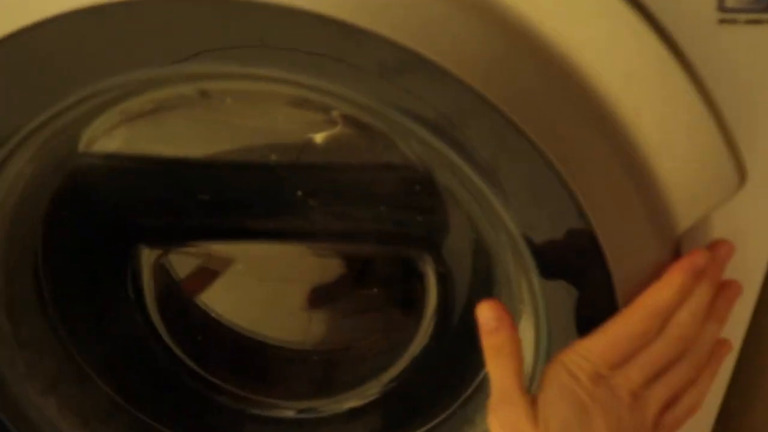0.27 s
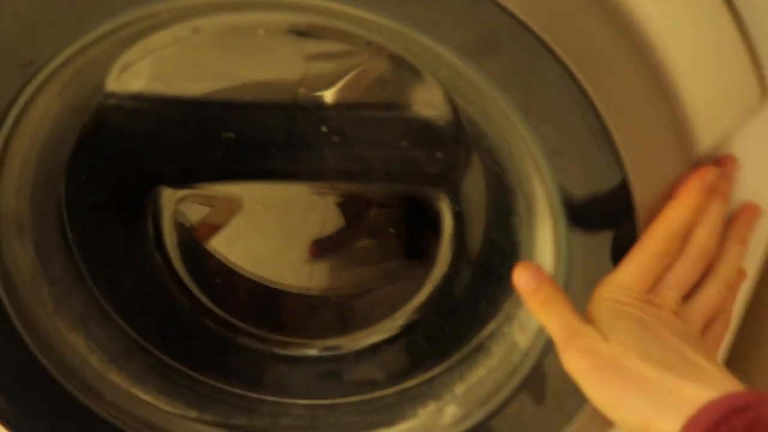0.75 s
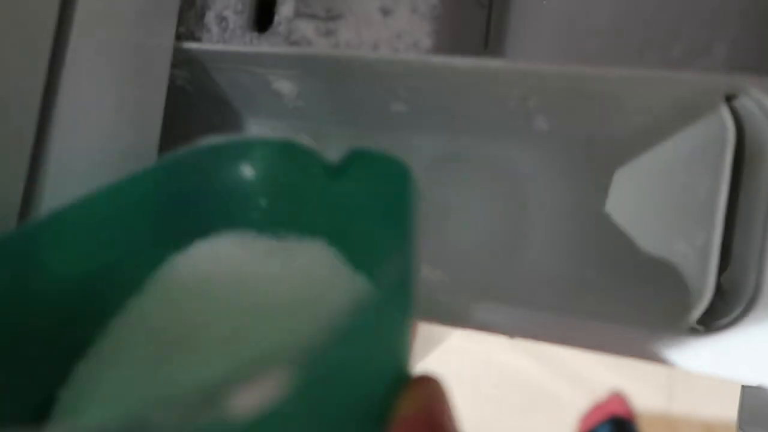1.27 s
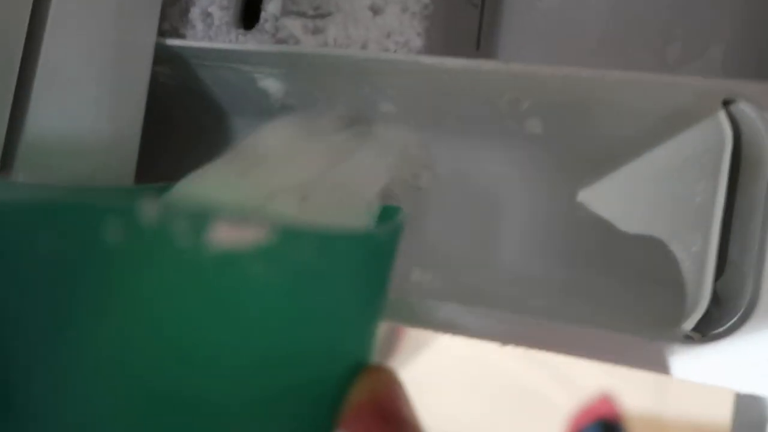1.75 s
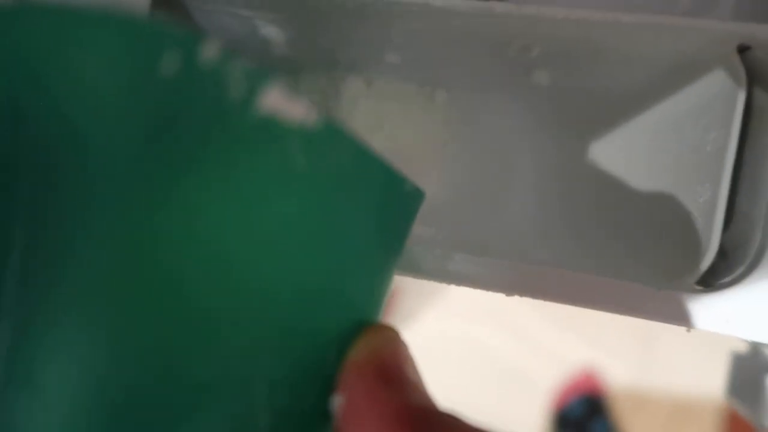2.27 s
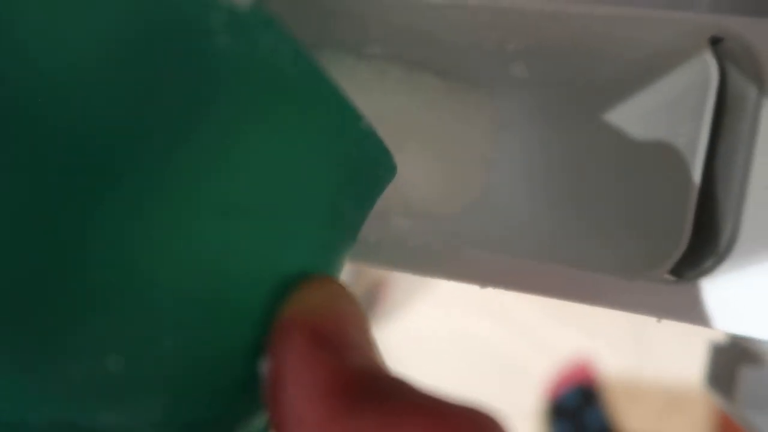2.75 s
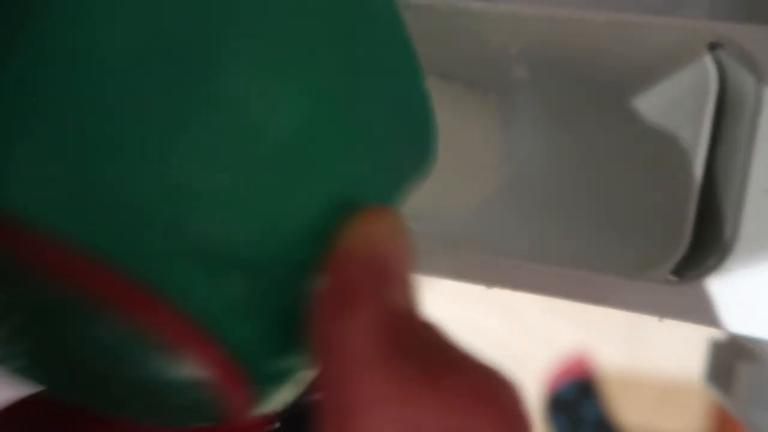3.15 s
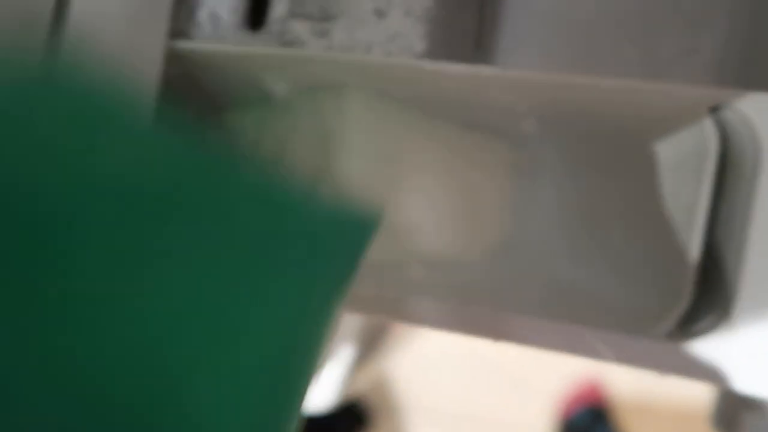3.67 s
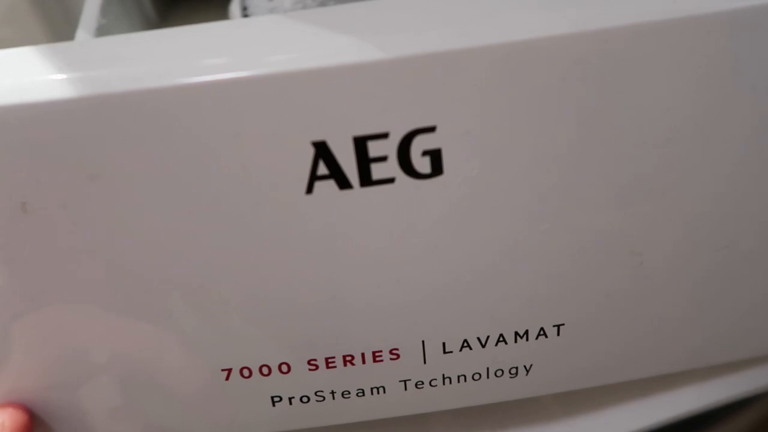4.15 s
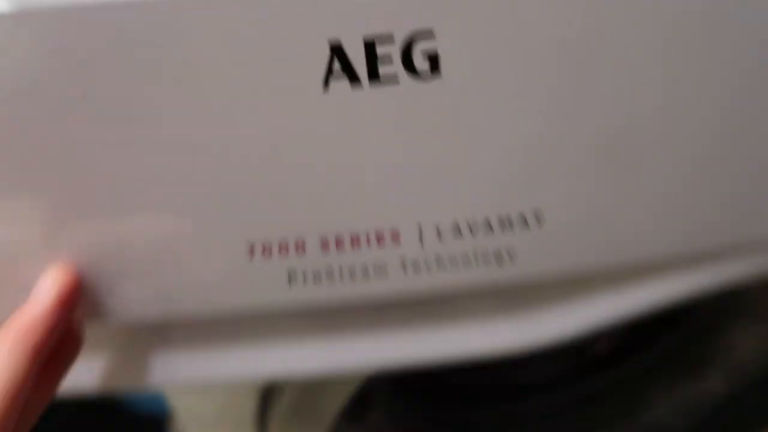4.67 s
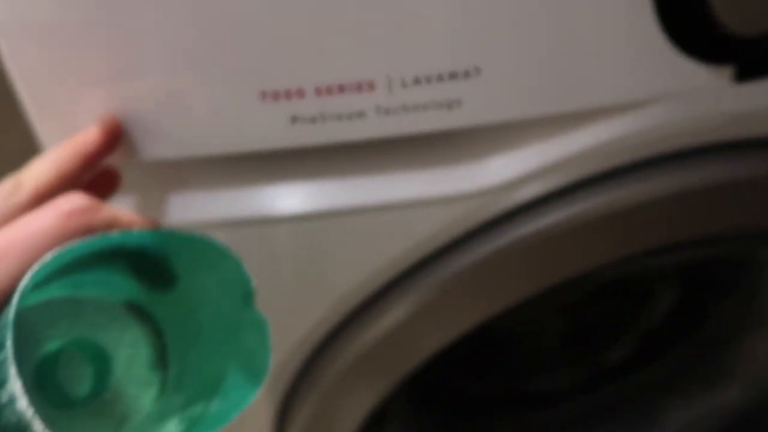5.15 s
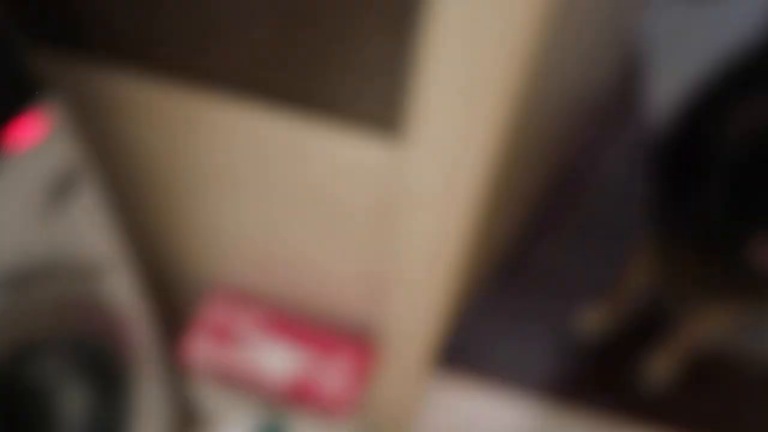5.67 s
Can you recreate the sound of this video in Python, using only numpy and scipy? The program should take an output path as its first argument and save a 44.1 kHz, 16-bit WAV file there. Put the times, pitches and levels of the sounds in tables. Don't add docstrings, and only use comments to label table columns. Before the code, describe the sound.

Close stereo in a small hard room: a palm brushes a washing machine door, which shuts with a booming double thunk and metallic ring. Powder hisses softly from a plastic scoop, which is then knocked hard three or four times. The drawer slides over grit and slams; after a brief silence a low pump hum surges in with watery churning.

```python
import sys
import numpy as np
from scipy import signal
from scipy.fft import rfft, irfft
from scipy.io import wavfile
from scipy.ndimage import uniform_filter1d, minimum_filter1d

SR = 44100
rng = np.random.default_rng(int(sys.argv[2]) if len(sys.argv) > 2 else 0)


def makeup_ratio(level_db):
    decades = np.asarray(level_db, float) / 20
    return 10 ** decades


def to_wav(sig):
    pcm = np.clip(np.atleast_2d(sig), -1, 1) * 32767
    pcm = np.round(pcm).astype(np.int16)
    wavfile.write(sys.argv[1], SR, pcm.T)


N = 260190

# t/s, peak/dB, bass re peak/dB, treble re peak/dB, favoured f/Hz
DOOR_BLOWS = [(0.114, -39.5, 6.5, -17, 1610), (0.141, -41.5, 6.5, -15, 215.5), (0.172, -44, -10, -26, 850),
              (0.293, -7, 9.5, -31, 452), (0.31, -7, 6.5, -27, 860), (0.404, -18, -2, -13, 439),
              (0.4207, -6.5, -4.5, 0, 450), (0.479, -27, 17, -9, 302), (0.619, -37.5, -8, 2.5, 300),
              (0.638, -43, -8, 3, 300), (0.754, -39.5, 18, -24.5, 342), (0.81, -26, -2.5, -25.5, 1700),
              (0.949, -40, -16, -49.5, 1140)]
SCOOP_BLOWS = [(1.447, -28, 1, -73, 470), (1.483, -42.5, 15, -11, 221), (1.446, -45.5, -20, -3, 4500),
               (1.557, -34, -15, -30, 450), (1.571, -39, -22, -16, 453), (1.873, -23.5, -9, -16, 910),
               (2.098, -39, -17, -35, 511), (2.269, -36, -21, -24, 482), (2.376, -13, -10, -106, 246),
               (2.399, -35, 3, -22, 240), (2.501, -39, -17, -35, 227), (3.039, -1, -11, -24.5, 520),
               (3.0745, -22, -15, -40, 487), (3.123, -21.5, -35, -42, 834), (3.2065, -3.5, -15, -27.5, 500),
               (3.268, -25.5, -12, -40, 760), (3.351, -3.5, -17, -28, 900), (3.514, -3, -31, -29, 430),
               (3.525, -14, -36, -26, 461)]
SCOOP_TICKS = [
    (1.724, -44, -20, -4, 2170),
    (3.1125, -18, -32, -16, 1800),
    (3.2585, -23, -18, -13.5, 2200),
    (3.379, -24, 1, -13.5, 1400),
    (3.627, -27.5, -7, -17.5, 2030),
    (3.725, -21, -18, -15, 1268),
]
DRAWER_BLOWS = [(4.515, -31.5, -14.5, -39, 277), (4.763, -27.5, -18, -27.5, 867),
                (4.821, -18, -9, -32, 622), (4.829, -20, -12, -40, 228), (4.835, -22, -25, -25, 1000),
                (4.903, -24.5, -25, -13, 1580), (4.93, -26, -23.5, -26, 727), (4.937, -6.5, -7, -18.5, 450),
                (4.944, -8, -28, -23, 740), (4.95, -4, -21, -10.5, 633), (4.952, 1, -10, -27, 705),
                (4.967, 2.5, -23.5, -13.5, 1350), (4.971, 6, -21.5, -12, 729), (4.975, -3.5, -12, -19, 861),
                (4.989, -9.5, -11, -17.5, 275), (5.477, -22.5, -15, -39, 161)]

# f/Hz, level/dB, T60/s
DOOR_MODES = [(56.2, -17, 0.48), (77, -15, 0.15), (139, -18.5, 0.12), (161, -7.5, 0.22), (222.7, -16, 0.49),
              (297.7, -19, 0.12), (450.6, -12.5, 0.046), (860, -13.5, 0.048), (1410, -13.5, 0.035),
              (2180, -21.5, 0.032), (2910, -10.5, 0.079), (3540, -2.5, 0.036), (4430, -17.5, .03),
              (8370, -16, .02), (12500, -22, .012)]
SCOOP_MODES = [(215, -16, 0.11), (258, -24.5, 0.27), (333, -17.5, 0.038), (472, -3, 0.024), (500, -28, 0.3),
               (672, 0.5, 0.023), (856, -1.5, 0.016), (1024, -7.5, 0.022), (836, -26, 0.15),
               (1246, -18, 0.041), (1390, -11, 0.04), (2193, -15.5, 0.027), (5260, -23.5, 0.026),
               (2970, -14, 0.026), (6520, -22, 0.018)]
DRAWER_MODES = [(91.5, -24, 0.5), (162.5, -24, 0.6), (205, -12, 0.25), (251, -12, 0.28), (430, -13, 0.13),
                (623, -13, 0.098), (729, -3, 0.048), (870, -12.5, 0.036), (1147, -3.5, 0.07),
                (1547, -13.5, 0.052), (2327, -21, 0.069), (360, -17.5, 0.074), (3210, -8, 0.039),
                (4830, -23.5, .03)]

# f/Hz, density/dB per Hz
DOOR_WASH = [(35, -31.5), (60, -14.5), (163, -13), (310, -17), (351, -26), (432, -22), (875, -23),
             (971, -23), (1500, -18), (8000, -28.5), (10600, -44), (16000, -55)]
SCOOP_WASH = [(100, -37), (170, -3), (486, 0.5), (597, -18.5), (885, 3), (1050, -14.5), (1260, -9),
              (1360, -38.5), (2390, -26), (7640, -41), (15000, -76)]
DRAWER_WASH = [(35, -40), (60, -16.5), (87, -5), (162, -13.5), (289, 3.5), (418, -5), (1130, -7),
               (5180, -28), (10900, -40.5), (15000, -79.5)]
# f/Hz, T60/s
CABINET_T60 = [(60, 0.99), (250, 0.49), (1500, 0.36), (8000, 0.32), (11000, .24)]
ROOM_T60 = [(60, 0.59), (250, 0.32), (1000, 0.27), (4000, 0.27), (12000, 0.075)]
HOUSING_T60 = [(60, 0.6), (250, 0.36), (1000, 0.27), (3000, 0.26), (8000, 0.19), (13000, .08)]

# multiple of the hum, level/dB
PUMP_ORDERS = [(1, -0.5), (1.5, -21.5), (2, -18), (4, -28.5), (7, -30.5)]
# t/s, level/dB
CHURN = [
    (5.47, -34.5),
    (5.62, -38),
    (5.68, -40),
    (5.9, -48),
]
# f/Hz, density/dB per Hz
CHURN_COLOUR = [(76, -12), (130, 2), (201, -7.5), (227, -12), (373, -9.5), (502, -23), (704, -13.5),
                (809, -23.5), (1940, -24.5), (12500, -68.5), (15000, -76)]

# t/s, level/dB, T60/s
PALM = [
    (0.048, -54.5, .25),
    (0.184, -52, .3),
]
# t/s, level/dB
SLIDE = [
    (4.48, -64.5),
    (4.522, -63.5),
    (4.542, -46.5),
    (4.814, -39.5),
    (4.828, -34.5),
    (4.888, -53),
    (4.906, -38),
    (4.924, -35),
    (4.94, -25),
]
# f/Hz, density/dB per Hz
SLIDE_COLOUR = [(59, -26), (100, -5.5), (206, 6), (471, -4.5), (818, 2), (1550, -8), (6020, -21),
                (13500, -35), (15000, -38), (16000, -63)]

# t/s, level/dB, T60/s
POWDER = [
    (1.302, -53, 0.32),
    (1.74, -53.5, 0.97),
    (2.148, -62, 0.85),
    (2.376, -57, 0.61),
    (2.604, -59.5, 9),
    (2.71, -57.5, 0.12),
    (2.834, -54, 0.2791),
    (2.9, -73, 0.13),
    (3.76, -56.5, 0.13),
    (4.048, -61.5, 0.072),
]
# t/s, level/dB
GRIT = [
    (4.5, -97),
    (4.586, -59),
    (4.652, -54.5),
    (4.814, -56.5),
    (4.822, -46.5),
    (4.874, -62),
    (4.934, -50),
    (4.94, -37.5),
]
# f/Hz, density/dB per Hz
POWDER_COLOUR = [(530, -23), (900, -11), (1530, -5), (1950, -25), (2220, 9.5), (2420, -4), (3230, -3),
                 (4100, -5.5), (5480, -0.5), (6480, -6.5), (12700, -14), (15100, -32.5), (16000, -74)]

# t/s, second resonance/dB, first re second/dB, third re second/dB
RUB = [(1.572, -51.5, 17.5, 1), (1.9, -71, 0, -13), (2.01, -53.5, 15, -18), (2.124, -44, 8.5, -6),
       (2.2, -52, 13, -3), (2.272, -55.5, 12, -8), (2.368, -50, 9.5, 5), (2.47, -58.5, 16, 3),
       (3.75, -42, 2, -26), (3.79, -49, 8.5, -27), (3.95, -49.5, -20, -27), (4.03, -49, -18, -23)]
# f/Hz, width/Hz
SCOOP_AIR = [
    (1330, 220),
    (455, 110),
    (2250, 260),
]
# t/s, level/dB, T60/s, f/Hz, rise/s
SQUEAKS = [(0.036, -52.5, 0.3, 1110, .05), (0.036, -55.5, 0.3, 1920, .05), (0.075, -54, .08, 1100, .04),
           (0.177, -45, .1, 880, .05), (0.2, -59, .3, 3550, .2), (0.19, -58, .3, 2400, .08),
           (0.824, -50, .07, 1500, .04), (0.955, -48, .1, 1140, .05), (1.31, -60, .2, 5300, .15),
           (1.772, -57, .12, 5450, .1), (2.83, -61, .2, 5200, .15), (3.728, -35, .08, 1330, .01),
           (5.2, -65, 1.9, 894, .21), (5.54, -43.5, 0.67, 1500, .21)]

# t/s, level/dB, T60/s
JOLTS = [(0.21, -28, 0.11), (0.28, -26.5, .2), (0.52, -26.5, 0.36), (0.84, -35.5, 0.59), (1.51, -39.5, 0.4),
         (1.85, -42, 0.5), (1.99, -39, 1.2), (3.04, -30, 1.2), (3.22, -30.5, .2), (3.35, -24, 0.26),
         (3.52, -25, 0.28), (4.0, -50, 5.2), (4.52, -40.5, 2.8), (4.95, -18, 0.11), (5.0, -41.5, 2.9),
         (5.48, -18.5, .9)]
# f/Hz, density/dB per Hz
RUMBLE_COLOUR = [(25, -17), (45, -1), (70, -0.5), (120, -1.5), (200, -18.5), (600, -75.5)]
# t/s, level/dB
ROOM_TONE = [(0.0, -59.5), (0.48, -57), (0.7, -61.5), (3.24, -59), (3.81, -65), (4.6, -59), (4.99, -53),
             (5.19, -76), (5.43, -78), (5.47, -59), (5.9, -56.5)]
# f/Hz, density/dB per Hz
ROOM_COLOUR = [(88, -37.5), (150, 0), (175, -17.5), (217, -3), (376, -9), (431, -6.5), (624, -17.5),
               (675, -12), (1600, -17.5), (12700, -40), (16000, -55.5)]

# f/Hz, side re mid/dB
BLOW_SIDE = [(60, -35), (250, -26.5), (500, -24.5), (1000, -17), (2000, -13.5), (4000, -7), (8000, 2.5),
             (14000, 8)]
ROOM_SIDE = [(60, -21.5), (110, -25.5), (200, -7), (380, -1.5), (700, -5), (1290, -3.5), (2380, -2.5),
             (4400, -1), (8120, -1.5), (15000, 4)]
# from t/s, to t/s
TREBLE_LOSSES = [
    (0.322, 0.402),
    (0.431, 0.61),
]
# from t/s, to t/s
GAPS = [
    (3.028, 3.036),
    (5.428, 5.471),
]

CONTACT_S = 0.0015
PUMP_START_S, HUM_HZ, HUM_DB = 5.472, 100.7, -26.5
SURGE_DB, SURGE_S = 5, 0.25
HUNT_HZ, HUNT_DB, HUNT_S = 10, 3, 0.28
STROKE_RISE_S, STROKE_T60_S = 0.15, 0.18
SPURT_RISE_S, JOLT_RISE_S = 0.21, 0.068
SWAY_DB = -50.5
WHINE_HZ, WHINE_DB = 13000, -34.5


def in_time(rows):
    s, level_db = np.transpose(rows)
    return np.interp(np.arange(N) / SR, s, level_db, left=-140, right=-140)


def at_hz(points, hz):
    table_hz, value = np.transpose(points)
    return np.interp(np.log(hz), np.log(table_hz), value)


def drift(rate):
    r = np.exp(-80 * np.pi * rate / SR)
    white = rng.standard_normal(N // 40 + 2002)
    slow = signal.lfilter([1], [1, -2 * r, r * r], white)[2000:]
    return np.interp(np.arange(N) / 40, np.arange(len(slow)), slow / slow.std())


def fade(power, t60):
    return signal.lfilter([1], [1, -makeup_ratio(-120 / (t60 * SR))], power)


def swells(rows, rise_s):
    t = np.arange(0, N, 32) / SR
    power = 0
    for s, level_db, t60 in rows:
        below_peak = np.where(t < s, (s - t) / rise_s, (t - s) / t60)
        power = power + makeup_ratio(2 * level_db - 120 * below_peak)
    return np.interp(np.arange(N) / SR, t, power)


def strikes(blows, hz, spread_db, favour_db):
    s, peak_db, bass_db, treble_db, favoured_hz = np.transpose(blows)
    hardest = np.argmax(peak_db)
    bass_share = np.clip(np.log2(500 / hz) / 1.7, 0, 1)
    treble_share = np.clip(np.log2(hz / 650) / 3.66, 0, 1)
    tilt_db = bass_share * (bass_db - bass_db[hardest])
    tilt_db = tilt_db + treble_share * (treble_db - treble_db[hardest])
    lift_db = favour_db * (np.exp(-(np.log2(hz / favoured_hz) / 0.43) ** 2) - 0.6)
    chance_db = spread_db * rng.standard_normal(len(s))
    train = np.full(N, 1e-18)
    train[np.round((s + CONTACT_S) * SR).astype(int)] = makeup_ratio(peak_db + tilt_db + lift_db + chance_db)
    return train


def ringing(blows, modes, soft_hz):
    out = np.zeros(N)
    for k, (hz, level_db, t60) in enumerate(modes):
        r = makeup_ratio(-60 / (t60 * SR))
        w = 2 * np.pi * hz / SR
        clicks = (-1) ** k * strikes(blows, hz, spread_db=1.5, favour_db=13.5)
        out += signal.lfilter([0, makeup_ratio(level_db) * np.sin(w)], [1, -2 * r * np.cos(w), r * r], clicks)
    return signal.sosfilt(signal.butter(1, soft_hz, fs=SR, output="sos"), out)


def door_ringing():
    return ringing(DOOR_BLOWS, DOOR_MODES, 11000)


def scoop_ringing():
    return ringing(SCOOP_BLOWS + SCOOP_TICKS, SCOOP_MODES, 7300)


def drawer_ringing():
    return ringing(DRAWER_BLOWS, DRAWER_MODES, 6000)


def blow_power(hz):
    def struck(blows, colour):
        return strikes(blows, hz, spread_db=0.0, favour_db=3.5) ** 2 * makeup_ratio(2 * at_hz(colour, hz))

    door = struck(DOOR_BLOWS, DOOR_WASH)
    scoop = struck(SCOOP_BLOWS + SCOOP_TICKS, SCOOP_WASH)
    drawer = struck(DRAWER_BLOWS, DRAWER_WASH)
    crack = fade(door * makeup_ratio(2 * -15), 0.03)
    crack = crack + fade(scoop * makeup_ratio(2 * -23), 0.027)
    crack = crack + fade(drawer * makeup_ratio(2 * -24), 0.065)
    wash = fade(door * makeup_ratio(2 * -31), at_hz(CABINET_T60, hz))
    wash = wash + fade(scoop * makeup_ratio(2 * -45), at_hz(ROOM_T60, hz))
    wash = wash + fade(drawer * makeup_ratio(2 * -36), at_hz(HOUSING_T60, hz))
    late = fade(drawer * makeup_ratio(2 * -62), 0.64) / (1 + (hz / 1100) ** 6)
    return crack * min(hz / 1800, 1) ** 2 + wash + late


def pump():
    t = np.maximum(np.arange(N) / SR - PUMP_START_S, 0)
    surge_db = SURGE_DB * np.exp(-t / SURGE_S)
    hunt_db = HUNT_DB * np.exp(-t / HUNT_S) * np.cos(2 * np.pi * HUNT_HZ * t + 0.99)
    turns = 2 * np.pi * HUM_HZ * t
    hum = 0
    for order, order_db in PUMP_ORDERS:
        waver_db = 2.44 * (order != 1) * drift(19)
        level = makeup_ratio(HUM_DB + surge_db - hunt_db + order_db + waver_db)
        hum = hum + level * np.sin(order * turns + rng.uniform(0, 6.7))
    return np.sqrt(2) * hum * (1 - np.exp(-t / 0.031))


def scoop_air():
    out = np.zeros(N)
    s, second_db, first_db, third_db = np.transpose(RUB)
    levels_db = [second_db, second_db + first_db - 3, second_db + third_db - 3]
    for (hz, width_hz), level_db in zip(SCOOP_AIR, levels_db):
        r = np.exp(-np.pi * width_hz / SR)
        poles = [1, -2 * r * np.cos(2 * np.pi * hz / SR), r * r]
        breath = signal.lfilter([1, 0, -1], poles, rng.standard_normal(N))
        breath = signal.lfilter([1, 0, -1], poles, breath)
        strokes = zip(s, level_db - 5.5, np.full(len(s), STROKE_T60_S))
        out += np.sqrt(swells(strokes, STROKE_RISE_S)) * breath / breath.std()
    return out


def squeaks():
    white = rng.standard_normal(N)
    out = 0
    for s, level_db, t60, hz, rise_s in SQUEAKS:
        band = signal.butter(2, [hz * 0.95, hz / 0.95], "band", fs=SR, output="sos")
        whistle = signal.sosfilt(band, white)
        out = out + np.sqrt(swells([(s, level_db, t60)], rise_s)) * whistle / whistle.std()
    return out


def powder_power():
    grains = swells(POWDER, SPURT_RISE_S) + makeup_ratio(2 * in_time(GRIT))
    return grains * makeup_ratio(2 * (-33.5 + 2.67 * drift(150)))


def sliding_power():
    rubbing = swells(PALM, SPURT_RISE_S) + makeup_ratio(2 * in_time(SLIDE))
    return rubbing * makeup_ratio(2 * (-33 + 0.61 * drift(70)))


def churn_power():
    return makeup_ratio(2 * (in_time(CHURN) - 15.0 + 1.0 * drift(37)))


def rumble_power():
    return (swells(JOLTS, JOLT_RISE_S) + makeup_ratio(2 * SWAY_DB)) * makeup_ratio(2 * -26.5)


def room_power():
    return makeup_ratio(2 * (in_time(ROOM_TONE) - 14.5))


def noises():
    layers = [(powder_power(), POWDER_COLOUR), (sliding_power(), SLIDE_COLOUR),
              (churn_power(), CHURN_COLOUR), (rumble_power(), RUMBLE_COLOUR), (room_power(), ROOM_COLOUR)]
    edges = 27.5 * 2 ** np.arange(0, 9.5, 1 / 3)
    white = rng.standard_normal((2, 2, N)) * np.sqrt(SR / 2)
    out = 0
    for k, (low, high) in enumerate(zip(edges, edges[1:])):
        hz = np.sqrt(low * high)
        steady = sum(power * makeup_ratio(2 * at_hz(colour, hz)) for power, colour in layers)
        steady = steady * makeup_ratio(2 * 1.6 * drift(7.0))
        struck = blow_power(hz)
        wide = steady * makeup_ratio(2 * at_hz(ROOM_SIDE, hz)) + struck * makeup_ratio(2 * at_hz(BLOW_SIDE, hz))
        band = signal.butter(2, [low, high], "band", fs=SR, output="sos")
        mid, side = signal.sosfilt(band, white[k % 2] * np.sqrt([steady + struck, wide]))
        lag = min(hz / 12000, 1.3) ** 2 * np.gradient(mid)
        out = out + mid + (side + lag) * [[1], [-1]]
    return out


def whine():
    level = makeup_ratio(in_time(ROOM_TONE) + WHINE_DB + 4.0 * drift(25))
    return level * np.sin(2 * np.pi * WHINE_HZ * np.arange(N) / SR)


def scene():
    solid = door_ringing() + scoop_ringing() + drawer_ringing()
    solid = solid + pump() + scoop_air() + squeaks() + whine()
    return solid + 0.3 * np.gradient(solid) * [[1], [-1]] + noises()


def lose_treble(x):
    hz = np.arange(N // 2 + 1) * SR / N
    lost_band = (hz > 9000) & ((hz < 10050) | (hz > 11200))
    top = irfft(rfft(x) * lost_band, N)
    lost = 0
    for start, end in TREBLE_LOSSES:
        lost = lost + np.interp(np.arange(N) / SR, [start - 0.004, start, end, end + 0.01], [0, 1, 1, 0])
    return x - lost * top


def limit(x):
    over_db = np.maximum(20 * np.log10(np.abs(x).max(axis=0) + 1e-9) + 0.2, 0)
    release_db = 60 * np.arange(N) / SR
    held_db = np.maximum.accumulate(over_db + release_db) - release_db
    widened_db = -minimum_filter1d(-held_db, size=201)
    ahead_db = uniform_filter1d(widened_db, size=101)
    return np.clip(x * makeup_ratio(-ahead_db), -1, 1)


def low_pass(x):
    return signal.sosfilt(signal.butter(12, 16500, fs=SR, output="sos"), x)


def record(dry):
    dry = signal.sosfilt(signal.butter(2, 42, "high", fs=SR, output="sos"), dry)
    dry = lose_treble(dry)
    for start, end in GAPS:
        dry = dry * np.interp(np.arange(N) / SR, [start - 0.005, start, end, end + 0.004], [1, 0, 0, 1])
    return low_pass(limit(dry))


dry = scene()
out = record(dry)
to_wav(out)
```